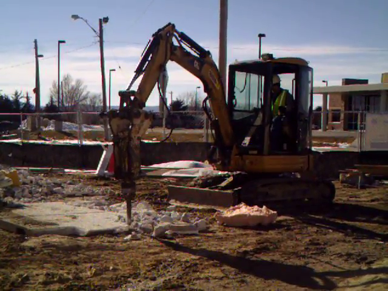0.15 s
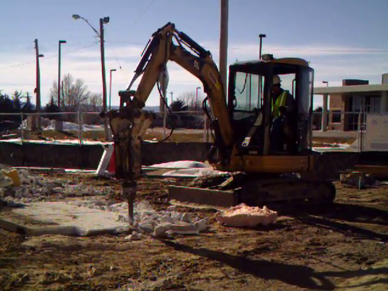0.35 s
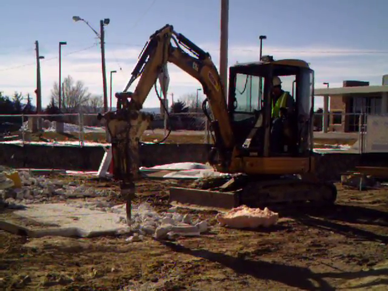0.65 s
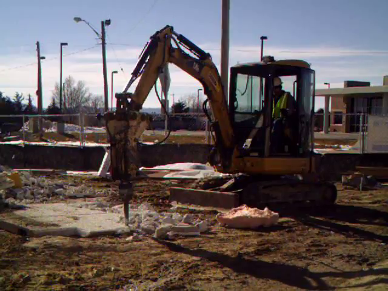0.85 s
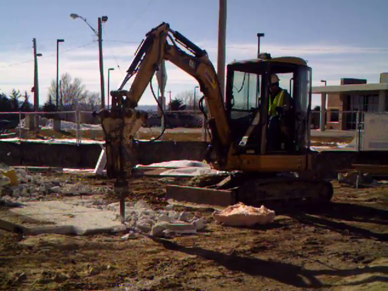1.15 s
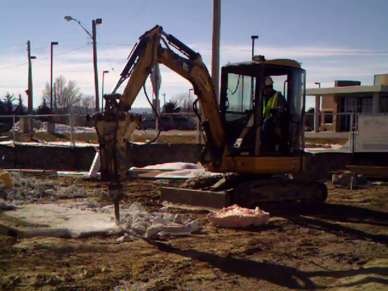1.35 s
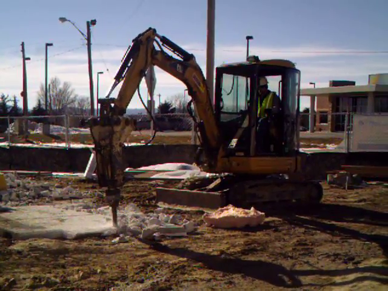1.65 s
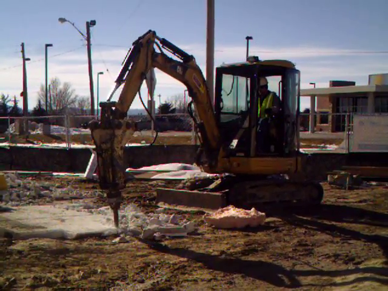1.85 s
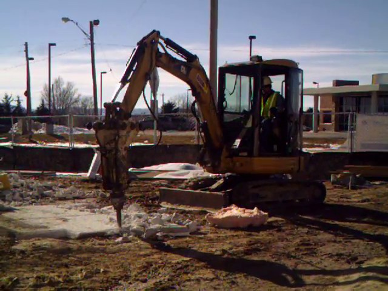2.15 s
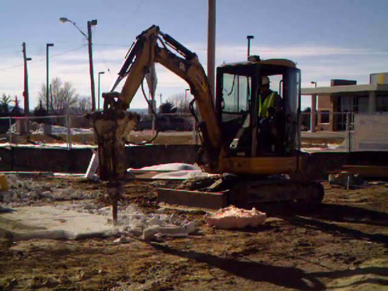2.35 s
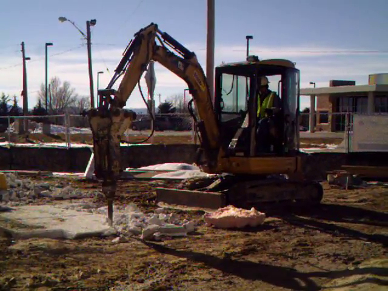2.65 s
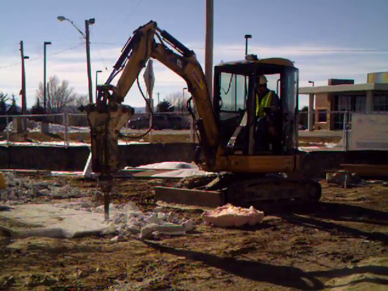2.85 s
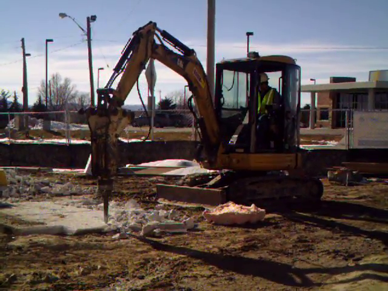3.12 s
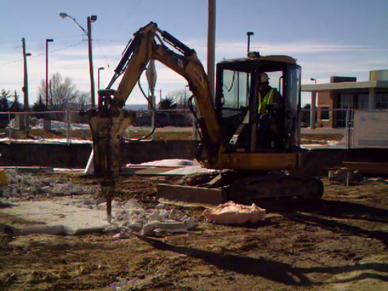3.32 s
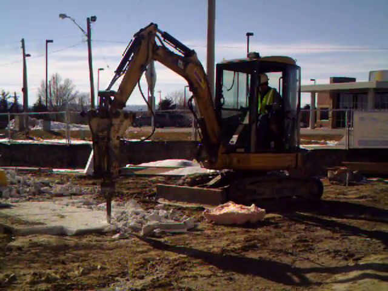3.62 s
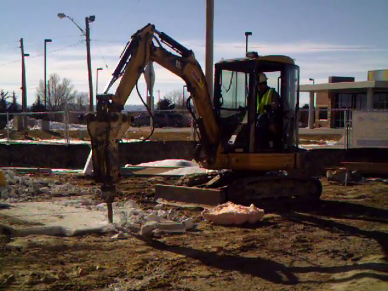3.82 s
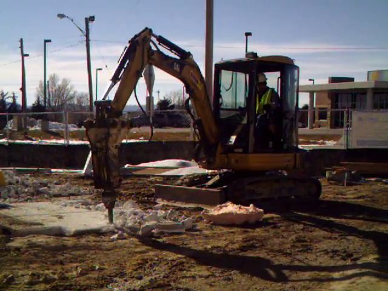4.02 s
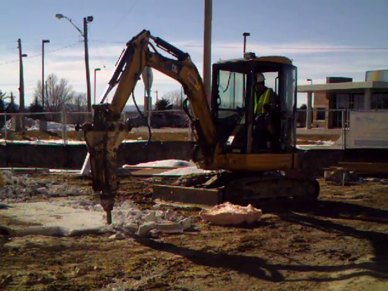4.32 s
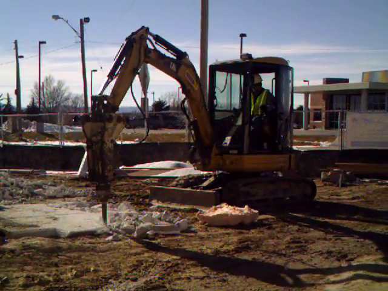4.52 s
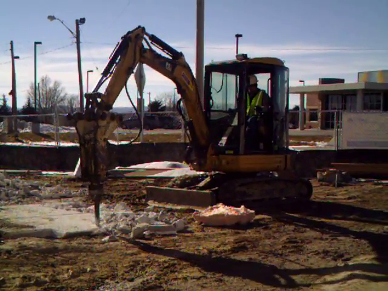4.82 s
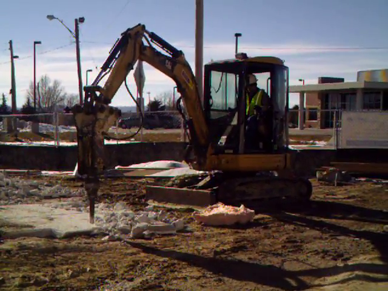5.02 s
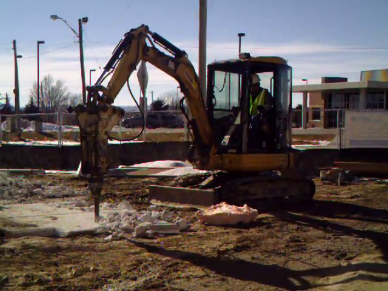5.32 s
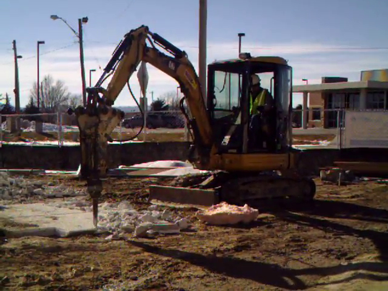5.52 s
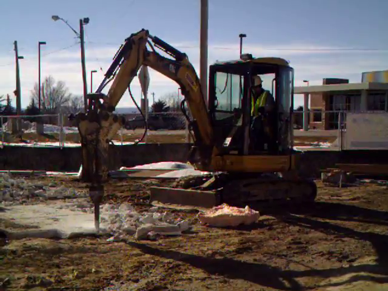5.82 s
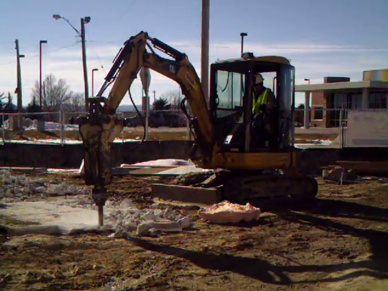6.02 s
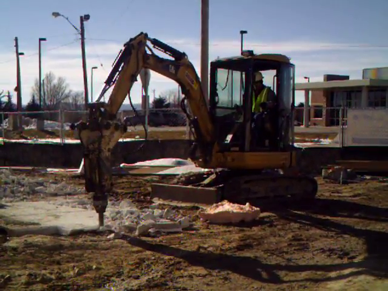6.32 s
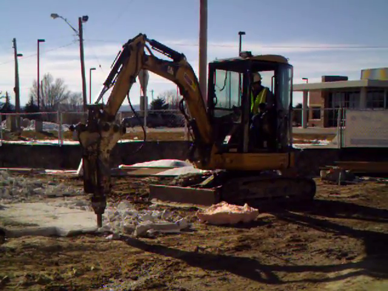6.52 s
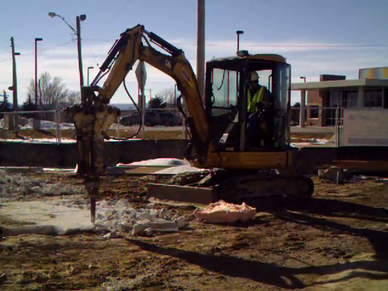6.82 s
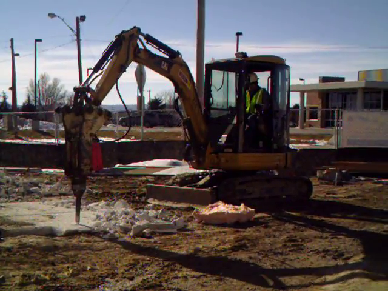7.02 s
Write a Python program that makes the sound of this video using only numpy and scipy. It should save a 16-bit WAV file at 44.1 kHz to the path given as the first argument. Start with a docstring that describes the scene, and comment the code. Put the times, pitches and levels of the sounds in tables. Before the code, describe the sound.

At an open work site, a small excavator's diesel throbs steadily while wind rumbles on the microphone. After about a second its hydraulic breaker hammers concrete, about eleven sharp, ringing blows a second, in three bursts of roughly one second each. Each burst begins with a heavy thud that thins as the slab gives way. Between bursts the chisel scrapes in rubble and sings faintly. Strong gusts pop and buffet near the end.

```python
"""Outdoor work site: a hydraulic breaker on a small excavator hammers a concrete slab in three bursts,
about eleven blows a second. Each blow is shaped noise (crack, rattle, chips) plus ringing modes of steel and slab.
Between bursts the chisel grinds in rubble: held noise through the steel modes, with fading sine pairs.
Behind, a diesel: fluttering tones and throbbing noise. Wind buffets the microphone, hardest near the end:
swelling noise and single pressure pulses."""
import sys
import numpy as np
from scipy import signal
from scipy.fft import rfft, irfft, next_fast_len
from scipy.io import wavfile

SR = 44100
rng = np.random.default_rng(int(sys.argv[2]) if len(sys.argv) > 2 else 0)


def store_wav(level_fs):
    """Save 16-bit WAV to argv[1]."""
    pcm = np.round(np.clip(np.atleast_2d(level_fs), -1, 1) * 32767)
    wavfile.write(sys.argv[1], SR, pcm.T.astype(np.int16))


N = 316197
TIME_S = np.arange(N) / SR

# All levels are relative; the functions add offsets.
# Engine and pump tones: f/Hz, level/dB
ENGINE_TONES = [(90.5, -41.5), (142, -54), (181, -61), (271.5, -55), (524, -55), (634, -64), (1034, -73),
                (2546, -76)]
# Engine noise spectrum: f/Hz, density/dB
ENGINE_NOISE = [(30, -4.5), (90, -15), (150, -7.5), (290, -22.5), (420, -17), (650, -17.5), (900, -27),
                (1500, -29), (2500, -30.5), (3600, -35.5), (5200, -34.5), (7500, -39.5), (11000, -50.5)]
# Engine gain, following load: t/s, level/dB
ENGINE_GAIN = [(0, 7), (1.1, 3.5), (2.8, 6), (3.4, 7), (4.7, 10), (5.4, 12), (7.17, 7.5)]
CLATTER_DB = -63   # before the engine gain

# Breeze on the microphone, rising and falling: t/s, rumble level/dB
BREEZE = [(0, -21), (.55, -26), (1.1, -29), (1.6, -29), (1.8, -32.5), (2.1, -22.5), (2.3, -30), (2.85, -38),
          (3.1, -32), (3.33, -35), (3.5, -23.5), (3.9, -36.5), (4.35, -26.5), (4.75, -31.5), (5.4, -28),
          (6.3, -20), (7.17, -30.5)]
# Gusts: t/s, length/s, buffeting level/dB
GUSTS = [(0, 0.036, -46), (0.132, .12, -44), (0.447, .11, -44), (.705, 0.13, -37.5), (2.383, 0.15, -43.5),
         (4.473, 0.088, -43), (5.12, 0.44, -51.5), (5.983, .12, -22), (6.141, .09, -24),
         (6.406, 0.051, -19.5), (6.581, 0.14, -23.5), (6.731, 0.29, -26.5)]
# Biggest eddies, popping on the port: t/s, pressure peak level/dB, time to peak/s, ragged hiss level/dB
POPS = [(.727, -10, 0.0036, -41), (.974, -10, 0.0069, -59), (2.384, -27, 0.0009, -21.5),
        (2.476, -11, 0.0029, -41), (3.031, -26, 0.0014, -41.5), (5.149, -19.5, 0.001, -57),
        (5.31, -8.5, .0012, -19), (5.396, -16, 0.00091, -34), (6.034, -22, 0.004, -13.5),
        (6.187, -23, 0.0024, -13.5), (6.556, -15, .001, -22), (6.702, -11, 0.0014, -12.5),
        (6.905, -32, 0.00084, -14.5), (6.923, -6.5, 0.0034, -14.5), (7.035, -19, .002, -22)]
# Slow wind pressure spectrum: f/Hz, density/dB
WIND_RUMBLE = [(8, 5.5), (18, 9.5), (30, -2.5), (50, -4.5), (100, -12), (200, -20.5), (400, -31),
               (900, -71.5)]
# Turbulence spectrum: f/Hz, density/dB
BUFFETING = [(50, 11.5), (130, 2), (250, 0.5), (500, -1.5), (1000, -11), (1500, -17), (2500, -29),
             (4500, -41), (10000, -67.5)]
# Tearing sound of one eddy, spectrum: f/Hz, density/dB
EDDY_HISS = [(80, -7), (200, 4.5), (450, -8), (900, 0), (1500, -8), (2200, -13.5), (3200, -26.5),
             (5000, -36), (10000, -78)]
BREEZE_BUFFET_DB = -27.5   # re breeze rumble
GUST_RUMBLE_DB, RUMBLE_DB_PER_GUST_DB = -17, 0.14   # rumble grows far more slowly than buffeting
GUST_RISE_S, GUST_RELEASE_T60_S = 0.011, 0.14
EDDIES_PER_S, EDDY_PEAK_S = 32, 0.0011   # small eddies in a gust; mean time to peak
EDDY_PRESSURE_DB, EDDY_HISS_DB, EDDY_SPREAD_DB = -2, 3, 5   # re gust buffeting; spread is +/-

# Chisel slips in broken concrete: t/s, length/s, grit level/dB, chisel song level/dB
GRINDS = [(.125, .03, -45.5, -80), (.46, 0.003, -37.5, -59), (.739, .013, -46.5, -72),
          (2.427, 0.019, -38.5, -66), (2.689, 0.0044, -42, -65.5), (3.064, 0.036, -30, -50),
          (3.264, 0.039, -30.5, -44.5), (3.87, .025, -32, -41.5), (4.23, .014, -38.5, -48),
          (4.439, 0.027, -40.5, -54.5), (4.808, .032, -32.5, -44.5), (4.869, .01, -28.5, -49),
          (5.059, 0.0046, -37.5, -59), (5.244, 0.0037, -50, -59.5), (5.307, 0.013, -45, -57.5),
          (5.474, 0.015, -39.5, -64), (5.57, 0.033, -19, -43), (5.901, 0.0056, -20.5, -39),
          (6.38, .008, -39, -45.5), (6.615, 0.048, -36, -58), (7.098, 0.029, -44.5, -77)]
# Crushed concrete spectrum: f/Hz, density/dB
GRIT = [(150, 21), (450, 9), (670, 18.5), (900, 9), (1400, 10), (1800, 10), (2800, 9), (4800, 6), (6000, 2),
        (7600, -3), (9000, -15.5), (11000, -92.5)]
# Struck steel modes: f/Hz, level/dB, t60/s
STEEL_MODES = [(679, -14.5, 0.081), (756, -16.5, 0.17), (1324, -10, 0.17), (1412, -10.5, 0.17),
               (1820, -22, 0.31), (2097, -8.5, 0.097), (2681, 3.5, 0.027), (2793, 3.5, 0.019),
               (3198, -2, 0.038), (3710, -15.5, 0.29), (4625, -5.5, 0.036), (4850, -5.5, 0.071),
               (4920, -3, 0.053), (5230, 5, 0.024), (5260, -8, 0.093), (6360, -13.5, 0.072),
               (7240, -13.5, 0.1), (7470, -15, 0.074), (9700, -33, 0.14)]
# Clean tones of the loose chisel: f/Hz, level/dB, t60/s
SONG_MODES = [(4830, -7, 0.36), (5290, -5, 0.79), (6650, 0, 0.71), (6635, -2, 0.42), (7130, -9, 0.3),
              (9360, -16, 0.51)]
CRUMBS_PER_S, CRUMB_S = 3, 0.0046   # small slips between the loud ones
CRUMB_DB, CRUMB_SPREAD_DB, CRUMB_SONG_DB = -50, 8.5, -25   # grit; +/-; song re grit

# Chisel blows: t/s, strength level/dB, chisel ring level/dB, housing clank level/dB
BLOWS = [(1.2091, -9.5, -28, -30), (1.324, -4, -36, -31), (1.4184, -3.5, -30, -28), (1.508, -2, -21.5, -36),
         (1.594, 1.5, -13, -28), (1.627, -8, -23, -34), (1.6813, 0, -14, -30.5), (1.7662, 0.5, -9.5, -22.5),
         (1.8515, -2, -18.5, -26), (1.9398, -2.5, -15, -29), (2.0522, -3, -23.5, -25.5),
         (2.1948, -3, -22.5, -29), (2.2754, -29, -22, -39), (3.5194, -2, -22, -28), (3.6479, 1.5, -27, -33),
         (3.7457, 3.5, -16, -18), (3.8385, 4.5, -9, -26.5), (3.8933, -10, -23.5, -21),
         (3.925, -1, -19, -27), (4.0104, -3, -24, -21), (4.0948, 1.5, -19.5, -31),
         (4.1895, 1.5, -21, -29.5), (4.315, -5.5, -17, -28), (4.9893, -45, -27.5, -37.5),
         (5.5771, 0, -31, -20.5), (5.5926, -4, -26, -21), (5.6853, -2.5, -24, -16), (5.7818, 4, -20, -25),
         (5.8708, 0, -25, -33.5), (5.959, 1.5, -16.5, -14), (5.976, 0, -32, -21), (6.0508, 1, -24.5, -35),
         (6.1369, 2.5, -18, -16), (6.2248, 1.5, -14, -39), (6.324, -3.5, -19, -22),
         (6.4567, -7.5, -23.5, -25.5)]
# Hammering bursts: start t/s, slab gives way t/s, housing rattle level/dB
BURSTS = [(1.1, 1.533, -24.5), (3.4, 3.752, -24.5), (5.5, 5.915, -20)]
# Crack spectrum: f/Hz, density/dB
CRACK = [(200, -8), (700, -13), (1000, -27), (1350, 3), (1700, -5), (2700, -3), (3500, 3), (4700, 8.5),
         (5800, -1), (7400, 7), (8500, -7), (10000, -9.5), (11300, -80)]
# Housing rattle spectrum: f/Hz, density/dB
RATTLE = [(110, 18.5), (160, -4), (280, 8), (480, 3), (680, 12.5), (1050, -5.5), (1370, 13.5), (1650, -3.5),
          (2750, 2.5), (4700, 0), (5900, 0.5), (7500, -5), (8600, -11), (11000, -48)]
# Slab and boom modes: f/Hz, level/dB, t60/s
SLAB_MODES = [(152.5, -1.5, 0.1), (282.4, -1.5, 0.043), (360, -16, 0.15)]
GIVE_WAY_S = 0.03   # how quickly the slab loses its hold on the chisel
RATTLE_DB_PER_BLOW_DB, FIRM_RATTLE_DB = 0.48, 2.5   # share reaching the housing; extra while the slab holds
LOOSE_THUD_DB, FIRM_THUD_DB = -26.5, 0.5   # re rattle, on broken and on sound concrete
CLANK_DB, LOW_RING_DB, HIGH_RING_DB = -0.5, -1, -1.5   # offsets: housing, low and high chisel modes
BRIGHT_DB_PER_BLOW_DB = 0.25   # soft knocks wake the higher chisel modes less
CUTOFF_HZ = 11000


def from_db(db):
    """Decibels to gain."""
    return np.exp(np.asarray(db) * (np.log(10) / 20))


def rms_one(x):
    """Scale to unit rms."""
    return x / np.sqrt(np.mean(x ** 2) + 1e-20)


def in_time(rows):
    """Interpolate (s, value) rows at every sample."""
    return np.interp(TIME_S, *np.transpose(rows))


def noise(spectrum, above_hz=0):
    """Noise of a given spectrum, with unit rms above a frequency."""
    size = next_fast_len(N, True)
    hz = np.arange(size // 2 + 1) * SR / size
    knots_hz, knots_db = np.transpose(spectrum)
    shape_db = np.interp(np.log(hz + 1e-3), np.log(knots_hz), knots_db)
    bins = rfft(rng.standard_normal(size)) * from_db(shape_db) * (hz > 0)
    power = 2 * np.sum(np.abs(bins[hz >= above_hz]) ** 2)
    return irfft(bins, size)[:N] * size / np.sqrt(power)


def drift(rate_hz):
    """Slow random curve of unit rms: two-pole low-passed noise, made at SR/20."""
    r = np.exp(-40 * np.pi * rate_hz / SR)
    slow = signal.lfilter([1], [1, -2 * r, r * r], rng.standard_normal(N // 20 + 4002))
    slow = slow[4000:]   # drop the filter's start
    return np.interp(np.arange(N) / 20, np.arange(len(slow)), rms_one(slow))


def flutter(depth_db, rate_hz):
    """Randomly swelling gain of unit mean power."""
    return rms_one(from_db(depth_db * np.clip(drift(rate_hz), -2, 2)))


def clicks(times_s, heights):
    """One impulse per event."""
    out = np.zeros(N)
    samples = np.clip(np.round(times_s * SR).astype(int), 0, N - 1)
    np.add.at(out, samples, heights)
    return out


def fade(power, t60_s):
    """Power that dies away after each input."""
    return signal.lfilter([1], [1, -from_db(-120 / (t60_s * SR))], power + 1e-18)


def smooth(power, rise_s):
    """One-pole smoothing of an onset."""
    r = np.exp(-1 / (rise_s * SR))
    return signal.lfilter([1 - r], [1, -r], power)


def struck(times_s, db, rise_s, t60_s):
    """Envelope that rises at each event and dies away."""
    return np.sqrt(smooth(fade(clicks(times_s, from_db(db) ** 2), t60_s), rise_s))


def held(times_s, lengths_s, db, t60_s):
    """Envelope fed for a while at each event, then dying away."""
    event_power = from_db(db) ** 2
    edges = clicks(times_s, event_power) - clicks(times_s + lengths_s, event_power)
    power = np.abs(np.cumsum(edges))
    return np.sqrt(fade(power, t60_s) * (1 - from_db(-120 / (t60_s * SR))))


def ring(force, hz, t60_s):
    """Two-pole mode: a unit click sets a sine of height 1 ringing."""
    r, w = from_db(-60 / (t60_s * SR)), 2 * np.pi * hz / SR
    return signal.lfilter([0, np.sin(w)], [1, -2 * r * np.cos(w), r * r], force + 1e-18)


def engine():
    """Firing orders and pump whine over mechanical noise that throbs with each firing."""
    wander_s = 0.0006 * drift(0.83)   # the governor lets the speed wander a little
    turn = 2 * np.pi * (TIME_S + wander_s)
    tones = 0
    for hz, db in ENGINE_TONES:
        tone = np.sqrt(2) * np.sin(hz * turn + rng.uniform(0, 2 * np.pi))
        tones = tones + from_db(db - 8.5) * tone * flutter(depth_db=4.0, rate_hz=3.8)
    firing_hz = ENGINE_TONES[0][0]
    clatter = noise(ENGINE_NOISE, above_hz=263) * (1 + 0.27 * np.cos(firing_hz * turn))
    return (tones + clatter * from_db(CLATTER_DB)) * from_db(in_time(ENGINE_GAIN))


def wind():
    """Slow pressure swells, ragged buffeting in the gusts and single eddies that pop."""
    gust_s, length_s, gust_db = np.transpose(GUSTS)
    breeze = from_db(in_time(BREEZE))
    push = swell(gust_s, length_s, GUST_RUMBLE_DB + RUMBLE_DB_PER_GUST_DB * gust_db)
    gusts = swell(gust_s, length_s, gust_db)
    rumble = noise(WIND_RUMBLE) * np.hypot(breeze, push) * flutter(depth_db=2, rate_hz=8.9)
    swirl = np.hypot(breeze * from_db(BREEZE_BUFFET_DB), gusts) * flutter(depth_db=4.5, rate_hz=94)
    pressure, ragged = np.zeros(N), np.zeros(N)
    for s, peak_db, peak_s, hiss_db in eddies():
        span = slice(int(s * SR), int((s + 20 * peak_s) * SR))
        age = np.maximum(TIME_S[span] - s, 0) / peak_s
        pulse = age * np.exp(1 - age)   # peaks at 1 when age is 1
        pressure[span] += from_db(peak_db) * pulse
        ragged[span] += from_db(hiss_db - 5.5) * pulse
    return rumble - pressure + noise(BUFFETING) * swirl + noise(EDDY_HISS) * ragged


def swell(times_s, lengths_s, db):
    """A gust builds up, holds and dies away."""
    return smooth(held(times_s, lengths_s, db, t60_s=GUST_RELEASE_T60_S), GUST_RISE_S)


def eddies():
    """Big eddies, plus small random ones shed by the gusts, their levels following the gust's."""
    rows = list(POPS)
    for s, length_s, gust_db in GUSTS:
        for when, size, span in rng.random((int(EDDIES_PER_S * length_s), 3)):
            db = gust_db + EDDY_SPREAD_DB * (2 * size - 1)
            peak_s = EDDY_PEAK_S * (0.5 + span)
            rows.append((s + when * length_s, db + EDDY_PRESSURE_DB, peak_s, db + EDDY_HISS_DB))
    return rows


def slips():
    """Loud slips, plus small random ones from first to last blow; rows as in GRINDS."""
    first_s, last_s = BLOWS[0][0], BLOWS[-1][0]
    when, size = rng.random((int(CRUMBS_PER_S * (last_s - first_s)), 2)).T
    times_s = first_s + when * (last_s - first_s)
    grit_db = CRUMB_DB + CRUMB_SPREAD_DB * (2 * size - 1)
    crumbs = np.c_[times_s, np.full(len(when), CRUMB_S), grit_db, grit_db + CRUMB_SONG_DB]
    return np.r_[GRINDS, crumbs]


def grinding(slip_rows):
    """Concrete crumbs crush under the sliding chisel and make the steel ring."""
    s, length_s, grit_db, song_db = slip_rows.T
    crush = held(s, length_s, grit_db, t60_s=0.055) * flutter(depth_db=1.5, rate_hz=660)
    wash = held(s, length_s, grit_db - 6.5, t60_s=0.43)
    metal = from_db(-21.5) * through_steel(rng.standard_normal(N) * crush)
    return noise(GRIT) * np.hypot(from_db(-3.5) * crush, wash) + metal


def through_steel(force):
    """A rubbing or rattling force keeps the steel's modes ringing."""
    out = 0
    for hz, db, t60_s in STEEL_MODES:
        evened = ring(force, hz, t60_s) * np.sqrt(4 * np.log(1000) / (t60_s * SR))   # offsets build-up
        out = out + from_db(db) * evened
    return out


def chisel_song(slip_rows):
    """Rebounds and slips set the loose chisel singing in beating, fading sine pairs."""
    blow_s, crack_db, rattle_db, *other_columns = blows()
    slip_s, length_s, grit_db, song_db = slip_rows.T
    times_s = np.r_[blow_s + 0.012, slip_s + length_s]
    levels_db = np.r_[rattle_db - 26, song_db]
    rub = drift(6.9)   # phase/rad: the bushing pulls on all the pitches
    out = 0
    for hz, db, t60_s in SONG_MODES:
        phase = 2 * np.pi * hz * TIME_S + rub
        beat = 2 * np.pi * rng.uniform(11, 22) * TIME_S + rub   # each mode is split into a close pair
        pair = np.sin(phase) + 0.5 * np.sin(phase + beat)
        pair = rms_one(pair * flutter(depth_db=3.5, rate_hz=25))
        out = out + pair * struck(times_s, levels_db + db, rise_s=0.0043, t60_s=t60_s)
    return out


def blows():
    """Sound concrete throws each blow back into the housing and thuds; as it gives way the thud sinks."""
    s, strength_db, ring_db, clank_db = np.transpose(BLOWS)
    start_s, gives_way_s, housing_db = np.transpose(BURSTS)
    burst = np.searchsorted(start_s, s) - 1
    firm = 0.5 - 0.5 * np.tanh((s - gives_way_s[burst]) / GIVE_WAY_S)   # 1 sound, 0 broken
    rattle_db = housing_db[burst] + RATTLE_DB_PER_BLOW_DB * strength_db + FIRM_RATTLE_DB * firm
    thud_db = rattle_db + firm * FIRM_THUD_DB + (1 - firm) * LOOSE_THUD_DB
    return s, strength_db, rattle_db, ring_db, clank_db + CLANK_DB, thud_db


def valve():
    """The control valve slaps over just before the piston lands."""
    s, crack_db, *other_columns = blows()
    early_s = rng.uniform(0.012, 0.014, len(s))
    return noise(CRACK) * struck(s - early_s, crack_db - 39.5, rise_s=0.001, t60_s=0.084)


def hammer():
    """Each blow: sharp crack, ringing steel, rattling housing, thud, flying chips and a wash from the site."""
    s, crack_db, rattle_db, *other_columns = blows()
    crack = noise(CRACK) * struck(s + 0.00044, crack_db - 14.0, rise_s=0.0014, t60_s=0.016)
    shake = struck(s, rattle_db, rise_s=0.006, t60_s=0.12)
    rattle = from_db(-3.5) * noise(RATTLE) * shake
    metal = from_db(-24.5) * through_steel(rng.standard_normal(N) * shake)
    wash_envelope = struck(s, rattle_db - 18, rise_s=0.0062, t60_s=0.78)
    wash = noise(GRIT) * flutter(depth_db=0.5, rate_hz=360) * wash_envelope
    return crack + steel() + plates() + rattle + metal + slab() + chips() + wash


def steel():
    """The chisel sits differently at every blow, so housing, low and high chisel modes trade strength."""
    s, crack_db, rattle_db, ring_db, clank_db, thud_db = blows()
    low_db = ring_db + LOW_RING_DB
    high_db = ring_db + HIGH_RING_DB + BRIGHT_DB_PER_BLOW_DB * crack_db
    out = 0
    for hz, db, t60_s in STEEL_MODES:
        part_db = clank_db if hz < 4000 else low_db if hz < 5100 else high_db
        chance_db = 5.45 * rng.standard_normal(len(s))
        heights = from_db(part_db + db - 3.5 + chance_db) * rng.choice([-1, 1], len(s))
        delay_s = rng.uniform(0.0003, 0.001, len(s))
        out = out + ring(clicks(s + delay_s, heights), hz, t60_s)
    return out


def plates(count=56):
    """Bracket, pins and boom add a thicket of weak modes, struck anew by every blow."""
    s, crack_db, rattle_db, *other_columns = blows()
    knots_hz, knots_db = np.transpose(RATTLE)
    out = 0
    for hz in np.linspace(550, 8000, count) + rng.uniform(-50.5, 50.3, count):
        mode_db = np.interp(np.log(hz), np.log(knots_hz), knots_db) - 26.0
        heights = from_db(rattle_db + mode_db) * rng.standard_normal(len(s))
        delay_s = rng.uniform(0.001, 0.007, len(s))
        out = out + ring(clicks(s + delay_s, heights), hz, 0.12 * (2000 / hz) ** 0.03)
    return out


def slab():
    """The recoil shakes slab and boom a moment after the crack."""
    s, *other_columns, thud_db = blows()
    out = 0
    for hz, db, t60_s in SLAB_MODES:
        delay_s = rng.uniform(0.0034, 0.01175, len(s))
        out = out + ring(clicks(s + delay_s, from_db(thud_db + db)), hz, t60_s)
    return out


def chips(count=4):
    """Each blow throws a few chips that tick against the steel and the rubble."""
    s, crack_db, rattle_db, *other_columns = blows()
    lands_s = s[:, None] + rng.uniform(0.0092, 0.071, (len(s), count))
    levels_db = rattle_db[:, None] - 18 + 1.5 * rng.standard_normal((len(s), count))
    return noise(CRACK) * struck(lands_s.ravel(), levels_db.ravel(), rise_s=0.00052, t60_s=0.014)


def scene():
    """Engine, wind and breaker at one microphone."""
    slip_rows = slips()
    machine = engine() + valve() + hammer()
    rubble = grinding(slip_rows) + chisel_song(slip_rows)
    return (machine + wind() + rubble)[None]


def record(dry):
    """The microphone sheds the deepest pressure, rounds the peaks and cuts the top."""
    passed = signal.sosfilt(signal.butter(1, 8, "high", fs=SR, output="sos"), dry)
    top_cut = signal.ellip(10, 0.3, 80, CUTOFF_HZ, fs=SR, output="sos")
    return signal.sosfilt(top_cut, np.tanh(passed))


dry = scene()
out = record(dry)
store_wav(out)
```